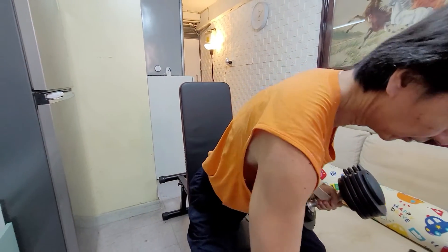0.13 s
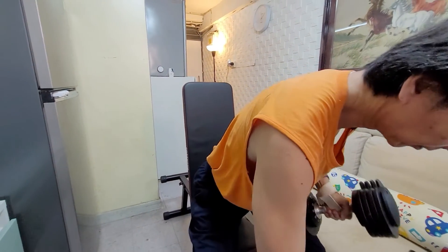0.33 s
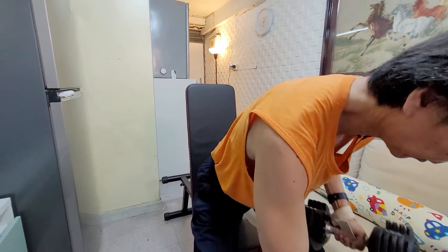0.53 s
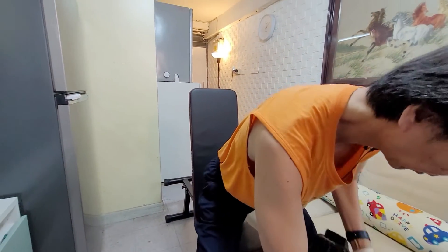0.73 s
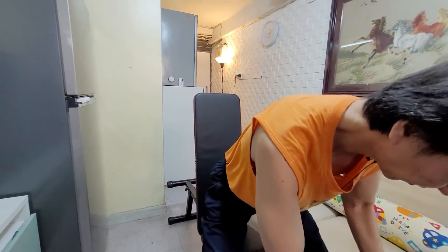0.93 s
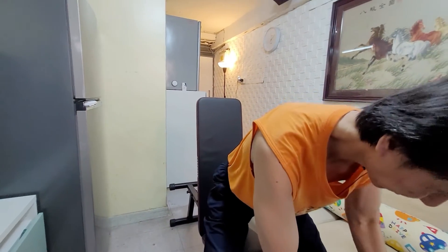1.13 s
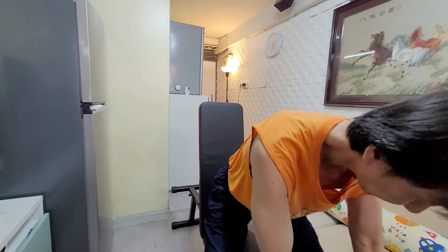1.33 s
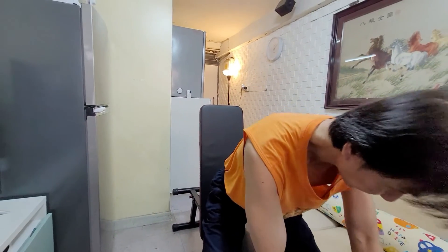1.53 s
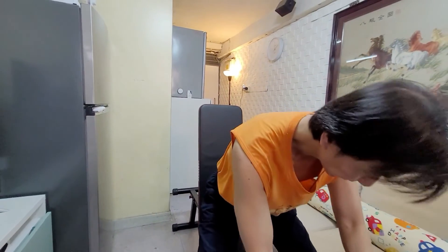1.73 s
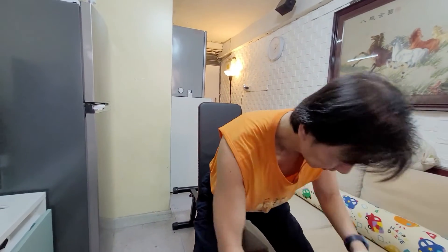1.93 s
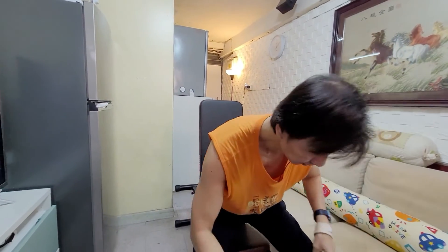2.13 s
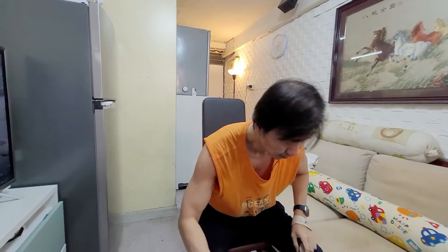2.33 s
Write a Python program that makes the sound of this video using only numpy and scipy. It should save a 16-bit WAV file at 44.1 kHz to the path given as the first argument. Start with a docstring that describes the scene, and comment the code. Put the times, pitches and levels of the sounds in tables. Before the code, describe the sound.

Dumbbells set down one after another, thudding and clanking over faint clothing rustle.

```python
"""A faint knock and shuffle, then a plate-loaded dumbbell thumps onto the floor of a small living room.
Each end drives the floor's damped modes and the loose plates rattle. A second dumbbell follows and
ends in a bright clank as a plate strikes the steel bar. Light hollow knocks fall around the landings,
and clothing rustles by friction as the lifter straightens up, over the low rush of the room."""
import sys
import numpy as np
from scipy import signal
from scipy.fft import rfft, irfft
from scipy.io import wavfile

SR = 44100
rng = np.random.default_rng(int(sys.argv[2]) if len(sys.argv) > 2 else 0)


def transcribe(signal):
    """Save signal, clipped to [-1, 1], as a 16-bit WAV file at the path in sys.argv[1]."""
    frames = np.atleast_2d(signal).T
    limited = np.clip(frames, -1, 1)
    pcm = np.round(limited * 32767).astype(np.int16)
    wavfile.write(sys.argv[1], SR, pcm)


N = 110250


def floor_thumps():
    """Impact excitation: each end drives the floor's modes up to its own cutoff, so some sound duller."""
    # landings: t/s, level/dB, pitch factor, ring time factor, mode cutoff f/Hz, relative thud level/dB
    landings = [(.2080, -4, 1.024, 0.72, 1160, -5.5), (0.2346, -25.5, 0.8, 0.44, 990, -1),
                (0.3255, -12.5, 1.01, 0.73, 870, -10.5), (.349, -27.5, 0.89, 0.62, 600, -2),
                (0.432, -34, 0.98, 1, 1400, -1.5), (1.3963, -6, 1.02, 0.62, 760, -3),
                (1.838, -34, 0.848, 0.57, 1400, 0.5)]
    # modes of the loaded floor: nominal f/Hz, level/dB, nominal T60/s
    floor_modes = [(76, -34, .5), (262, -13, .07), (292, 0, .085), (322, -10, .07), (390, -9, .12),
                   (500, -15, .1), (585, -13, .12), (690, -14, .12), (885, -15, .12), (965, -13, .11)]
    # spectrum of the dull thud: f/Hz, level/dB
    thud_spectrum = [(30, -45), (100, -13.5), (300, 0), (480, -1.5), (650, -3), (1000, -11.5), (1400, -20),
                     (3000, -38.5), (16000, -53)]
    rise_s, crunch_s = 0.00098, 0.0067
    out, t = np.zeros((2, N)), np.arange(SR // 2) / SR
    hz, db, t60 = np.transpose(floor_modes)[:, :, None]
    for start_s, level_db, pitch, stretch, cutoff_hz, thud_db in landings:
        envelopes = amp(db - 60 * t / (t60 * stretch)) / np.sqrt(1 + (hz / cutoff_hz) ** 10)
        boom = (envelopes * np.sin(2 * np.pi * hz * pitch * t)).sum(0) * (1 - np.exp(-t / rise_s))
        blow = amp(8.5) * (t == 0) + amp(-4.5) * chatter(t, crunch_s)
        thud = amp(thud_db) * colour(blow, thud_spectrum)
        add(out, start_s, -amp(level_db) * (boom + thud))
    return out * amp([[-.5], [.5]])  # slightly to the right


def plate_rattles():
    """Collisions: loose plates chatter and ring briefly, each rattle with its own spectral tilt."""
    # collisions: t/s, level/dB, chatter time constant/s, tilt/(dB per octave), relative ring level/dB
    collisions = [(0.2083, -23, 0.0058, -1.5, -6.5), (0.2118, -24, 0.0018, 1.5, -14),
                  (0.233, -33, 0.016, -2, -7), (0.307, -32, 0.0023, -6, 0.5), (.314, -30, 0.0014, -2, -4.5),
                  (.3262, -32.5, 0.013, -3, -4), (0.43, -49.5, 0.01, -0.5, -23),
                  (1.398, -37.5, 0.031, 0.5, -21), (1.484, -36, 0.0065, -7, -25),
                  (1.514, -38.5, 0.012, -1.5, -37), (1.621, -44.5, 0.024, -7, -13),
                  (1.918, -46, 0.0043, -2.5, -8.5)]
    # contact spectrum of plate on plate: f/Hz, level/dB
    clack_spectrum = [(200, -15.5), (700, -2.5), (1600, 5), (3200, -2), (5400, -2.5), (6500, -7),
                      (9000, -13), (13000, -13), (16000, -21)]
    # modes of the plate stack: f/Hz, level/dB, T60/s
    plate_modes = [(1580, -2, .08), (2304, 1, .12), (2401, 1, .11), (2929, -2, .07), (3350, -2, .055),
                   (3885, -10, .14), (5416, -7, .14)]
    (clacks, ringing), t = np.zeros((2, 2, N)), np.arange(SR // 2) / SR
    for start_s, level_db, chatter_s, tilt_db, ring_db in collisions:
        add(clacks, start_s, amp(level_db) * colour(chatter(t, chatter_s), clack_spectrum, tilt_db))
        add(ringing, start_s, amp(level_db + ring_db) * ring(plate_modes, t, tilt_db / 2))
    return room(clacks, wet_db=1, early_db=-2) + room(ringing, wet_db=-12, early_db=-26.5)


def bar_clank():
    """Free vibration: a plate chatters against the steel bar, which rings from the first contact."""
    # contacts of plate and bar: t/s, level/dB, chatter time constant/s
    contacts = [(1.4266, -21.5, 0.0069), (1.4346, -26, 0.003), (1.445, -28, 0.0035)]
    # modes of bar and collar: f/Hz, level/dB, T60/s
    bar_modes = [(3461, -10, .15), (4113, -6, .11), (4185, -4, .11), (4243, -5, .12), (4304, -4, .1),
                 (4365, -2, .12), (4537, -5, .13), (5254, -11, .15), (5700, -8, .09), (5845, -11, .16),
                 (6907, -14, .1), (7444, -10, .19), (8140, -12, .12), (8260, -12, .09), (9838, -18, .12),
                 (10800, -15, .1), (11850, -14, .1)]
    # contact spectrum of steel on steel: f/Hz, level/dB
    crack_spectrum = [(200, -9), (700, -4.5), (2800, -2), (4300, 0), (6000, -6), (9000, -16.5),
                      (16000, -29)]
    (cracks, ringing), t = np.zeros((2, 2, N)), np.arange(SR // 2) / SR
    for start_s, level_db, chatter_s in contacts:
        add(cracks, start_s, amp(level_db) * colour(chatter(t, chatter_s), crack_spectrum))
    add(ringing, contacts[0][0], amp(-21.5) * ring(bar_modes, t))
    return room(ringing, wet_db=-11, early_db=-18) + room(cracks, wet_db=5, early_db=0)


def hollow_knocks():
    """Resonance: light taps all excite the same hollow body as the weight shifts."""
    # taps: t/s, level/dB, tilt/(dB per octave)
    taps = [(0.0876, -43, -4.5), (.178, -48, -2), (0.8549, -34.5, .5), (1.0254, -34.5, -.5),
            (1.089, -49, 2.5), (1.2286, -41, 0), (1.788, -46.5, -1.5), (1.842, -47, 0),
            (2.064, -43.5, -3.5), (2.297, -46.5, -6)]
    # response of the hollow body: f/Hz, level/dB
    body_spectrum = [(100, -24.5), (330, -9), (520, 4), (800, 0.5), (1100, 4), (1380, -7.5), (2200, -5.5),
                     (3300, -19), (6000, -19), (16000, -34)]
    out, t = np.zeros((2, N)), np.arange(SR // 4) / SR
    tap = amp(8.5) * (t == 0) + chatter(t, decay_s=.017)
    for start_s, level_db, tilt_db in taps:
        add(out, start_s, amp(level_db) * colour(tap, body_spectrum, tilt_db))
    return out


def clothing_rustle():
    """Sliding friction: fabric gives a soft hiss with tiny random catches."""
    # envelope of the rubbing: t/s, level/dB
    rub_levels = [(0, -70), (.09, -69.5), (0.139, -55.5), (0.549, -58), (.7, -64.5), (0.836, -64),
                  (0.936, -57.5), (1.297, -59), (1.367, -54), (1.661, -53), (1.81, -61), (1.9, -53),
                  (2.102, -54.5), (2.19, -64), (2.5, -64)]
    # spectrum of sliding fabric: f/Hz, level/dB
    cloth_spectrum = [(100, 4.5), (400, 3.5), (1000, -2), (2000, -5), (4000, -9.5), (7700, -11.5),
                      (8800, -17.5), (11500, -14), (16000, -24.5)]
    catches_per_s, catch_gain = 560, 0.44
    catches = rng.standard_normal((2, N)) * (rng.random(N) < catches_per_s / SR)
    catches *= amp(2.4 * np.minimum(rng.exponential(1, N), 4))  # a few stand out
    friction = spread(rng.standard_normal((2, N)) + catch_gain * unit(catches))
    envelope = amp(np.interp(np.arange(N) / SR, *np.transpose(rub_levels)))
    return envelope * unit(colour(friction, cloth_spectrum))


def dumbbell_shuffles():
    """Contact noise: soft swells of low rumble as the dumbbell shifts before landing and later rolls."""
    # shuffles: t/s, duration/s, level/dB
    swells = [(0.104, 0.11, -43), (1.658, 0.23, -53)]
    # spectrum of the shuffling: f/Hz, level/dB
    shuffle_spectrum = [(30, -31), (310, -3.5), (600, -20.5), (4000, -31)]
    out = np.zeros((2, N))
    for start_s, length_s, level_db in swells:
        n = round(length_s * SR)
        rumble = colour(spread(rng.standard_normal((2, SR))), shuffle_spectrum)[:, :n]
        add(out, start_s, amp(level_db) * np.hanning(n) * rumble)
    return out


def background():
    """Stationary noise: the low rush of the room, slightly to the right."""
    # spectrum of the ambient noise: f/Hz, level/dB
    rush_spectrum = [(15, -47), (25, -1.5), (120, -2.5), (293, 2), (531, -8.5), (796, -12), (1330, -32.5),
                     (5000, -47.5), (16000, -27)]
    rush = unit(colour(spread(rng.standard_normal((2, N))), rush_spectrum))
    return amp(-57) * rush * amp([[-.7], [.7]])


def room(x, wet_db, early_db):
    """Reverberation: convolution with the direct sound, near reflections and a diffuse tail."""
    # reverberation time: f/Hz, T60/s
    decay_times = [(80, 1), (300, 0.27), (1000, 0.29), (4000, 0.17), (12000, 0.31)]
    # reflections from nearby surfaces: delay/s, left gain, right gain
    reflections = [(.0036, 0.84, 0.96), (.0071, 0.42, 0.44), (0.0107, 0.77, 0.97), (.0185, -0.23, -.08),
                   (.029, 0.052, 0.34)]
    build_up_s, left_delay_s = 0.0024, .00022
    n = SR * 3 // 4
    hz, t, bands = signal.stft(spread(rng.choice([-1., 1.], (2, n))), SR, nperseg=256)
    bands *= amp(-60 * t / at_frequency(decay_times, hz)[:, None])
    tail = signal.istft(bands, SR, nperseg=256)[1][:, :n]
    tail *= 1 - np.exp(-(np.arange(n) / SR / build_up_s) ** 2)
    response = amp(wet_db) * tail / np.linalg.norm(tail[0])
    add(response[1], 0, np.ones(1))  # direct sound reaches the right first
    add(response[0], left_delay_s, np.ones(1))
    for delay_s, left, right in reflections:
        add(response, delay_s, amp(early_db) * np.array([[left], [right]]))
    return signal.fftconvolve(x, response, axes=1)[:, :N]


def ring(modes, t, tilt_db=0):
    """Modal superposition: damped sinusoids rise over the contact time; tilt is in dB per octave."""
    contact_s = 0.0002
    hz, db, t60 = np.transpose(modes)[:, :, None]
    phase = rng.random((len(modes), 1)) + .35 * rng.random((2, len(modes), 1))  # cycles, for each side
    envelopes = amp(db + tilt_db * np.log2(hz / hz.mean()) - 60 * t / t60)
    return (envelopes * np.sin(2 * np.pi * (hz * t + phase))).sum(1) * (1 - np.exp(-t / contact_s))


def chatter(t, decay_s):
    """Exponential decay: dense micro-contacts merge into a dying noise."""
    return spread(rng.choice([-1., 1.], (2, len(t)))) * np.exp(-t / decay_s)


def spread(pair):
    """Partial coherence: two independent signals become left and right, bass together, treble apart."""
    # side relative to mid: f/Hz, level/dB
    side_levels = [(40, -8), (150, -17), (300, -14), (600, -5.5), (1200, 1), (16000, 0)]
    n = pair.shape[1]
    mid, side = rfft(pair)
    width = amp(at_frequency(side_levels, np.fft.rfftfreq(n, 1 / SR)))
    return irfft(np.array([mid + width * side, mid - width * side]) / np.sqrt(1 + width ** 2), n)


def colour(x, spectrum, tilt_db=0):
    """Minimum-phase filtering at unit energy, with the spectrum tilted in dB per octave."""
    hz = abs(np.fft.fftfreq(4096, 1 / SR))
    gain_db = at_frequency(spectrum, hz) + tilt_db * np.log2(np.maximum(hz, 200) / 1000)
    log_response = np.conj(signal.hilbert(np.log(amp(gain_db))))
    taps = np.fft.ifft(np.exp(log_response)).real[:len(hz) // 2]
    return signal.fftconvolve(x, taps[None] / np.linalg.norm(taps), axes=1)[:, :x.shape[1]]


def at_frequency(points, hz):
    """Interpolation on a logarithmic frequency axis."""
    f, value = np.transpose(points)
    return np.interp(np.log(hz + 1), np.log(f + 1), value)


def amp(db):
    """Amplitude ratio of a level in decibels."""
    return 10 ** (np.asarray(db) / 20)


def unit(x):
    """Normalisation to an rms of one."""
    return x / np.sqrt(np.mean(x ** 2) + 1e-20)


def add(mix, start_s, sound):
    """Superposition of a sound on the mix, in place."""
    part = mix[..., max(round(start_s * SR), 0):][..., :sound.shape[-1]]
    part += sound[..., :part.shape[-1]]


def scene():
    """Linear superposition of the reverberant impacts, the rustle, the shuffles and the background."""
    dumbbells = room(floor_thumps(), wet_db=-13, early_db=-16.5) + plate_rattles() + bar_clank()
    knocks = room(hollow_knocks(), wet_db=-9.5, early_db=-11)
    return dumbbells + knocks + clothing_rustle() + dumbbell_shuffles() + background()


def record(dry):
    """Band limiting and saturation: the microphone's low cut, a soft ceiling, then a low-pass."""
    low_cut_hz, ceiling, high_cut_hz = 50, .9, 15600
    lean = signal.sosfilt(signal.butter(2, low_cut_hz, "high", fs=SR, output="sos"), dry)
    limited = lean / (1 + (lean / ceiling) ** 10) ** (1 / 10)
    low_pass = signal.firwin(511, high_cut_hz, window=("kaiser", 9), fs=SR)
    return signal.oaconvolve(limited, low_pass[None], "same")


dry = scene()
out = record(dry)
transcribe(out)
```